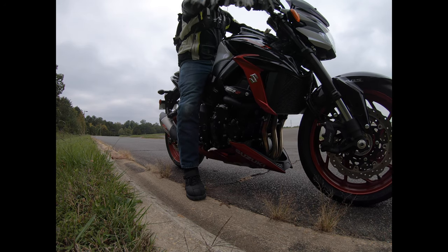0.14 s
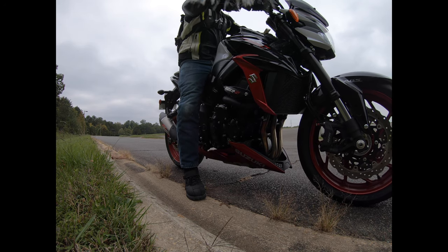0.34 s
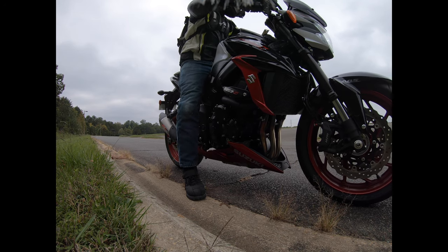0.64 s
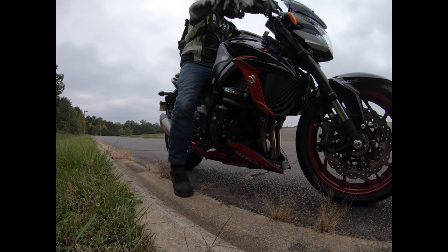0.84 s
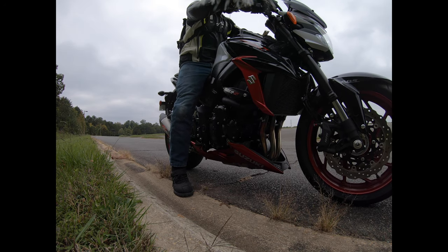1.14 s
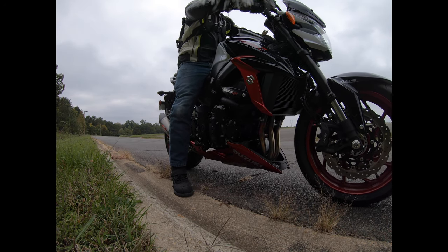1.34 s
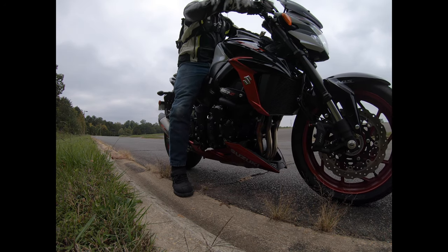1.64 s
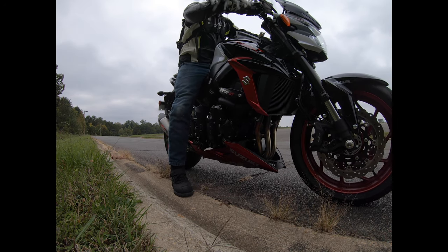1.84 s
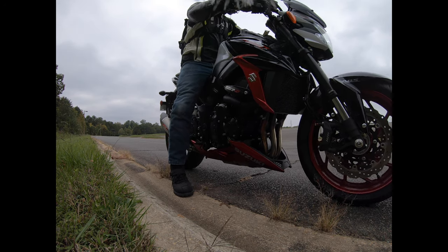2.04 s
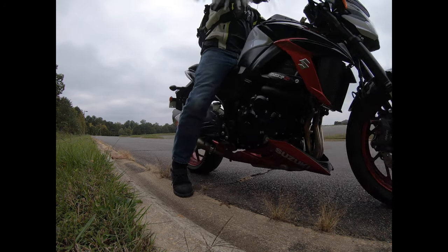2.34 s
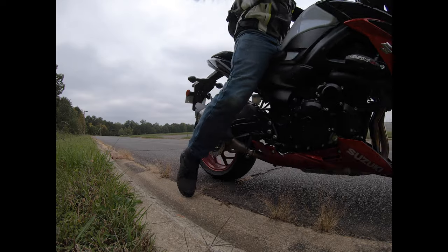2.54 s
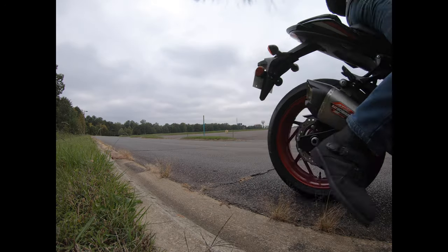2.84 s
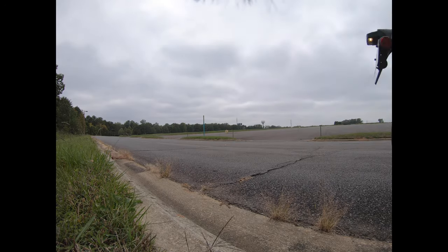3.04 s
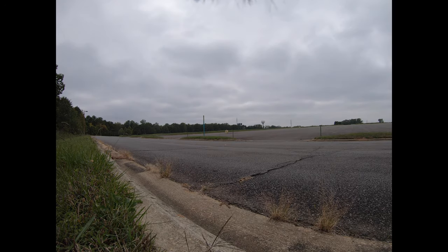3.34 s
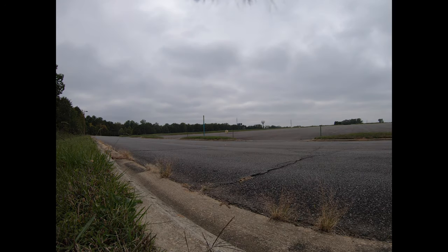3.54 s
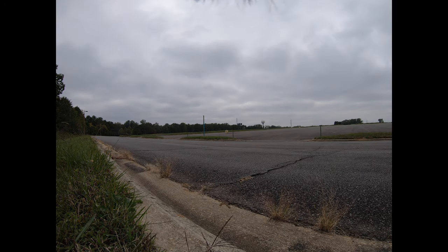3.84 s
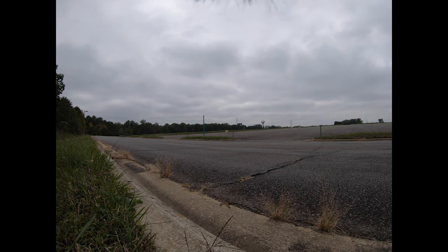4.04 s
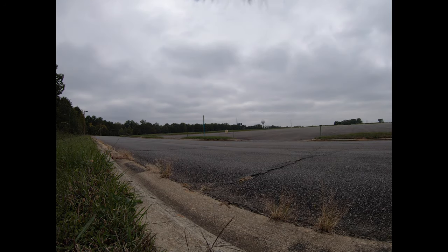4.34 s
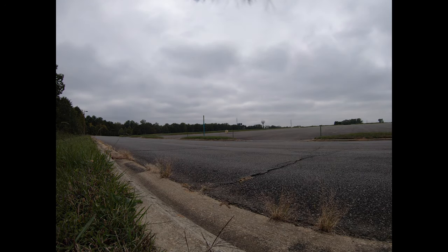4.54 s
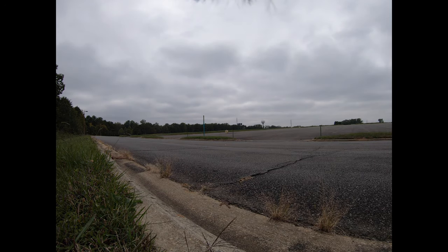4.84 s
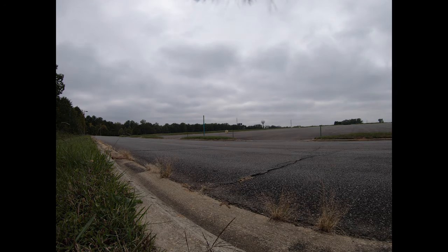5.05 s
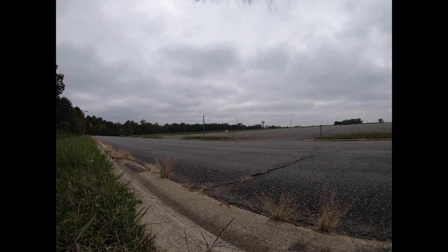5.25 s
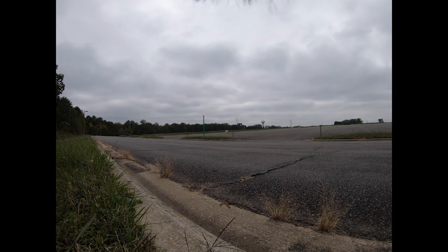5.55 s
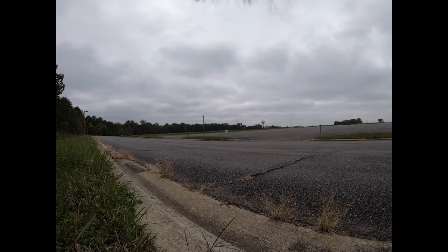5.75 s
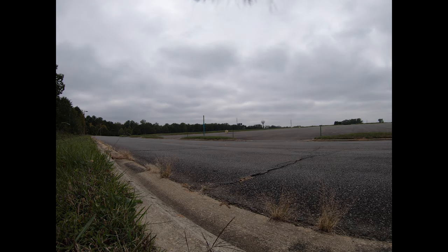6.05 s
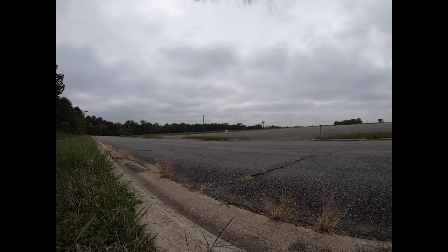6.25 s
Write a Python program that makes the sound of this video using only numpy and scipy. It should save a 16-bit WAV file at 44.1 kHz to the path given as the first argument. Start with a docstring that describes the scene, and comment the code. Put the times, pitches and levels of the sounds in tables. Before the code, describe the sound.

On an open road, a sharp gearbox clack cuts through the low idle of a nearby motorcycle. Two quick revs follow and die down. The bike sets off with a slight stutter and goes by the stationary roadside microphone, its exhaust loud and throaty. The pitch dips, then rises smoothly as the sound recedes. Engine clatter gives way to a soft outdoor rush and a few gentle, low wind buffets.

```python
"""A four-cylinder motorcycle idles close by, clacks into gear, is blipped twice and pulls away.
It stumbles as the clutch bites, passes, sags until the clutch locks, then climbs into the distance.
The note is a periodic train of exhaust pulses, shaped by the resonances of the silencer. Impacts ring
the gearbox and engine covers, meshing teeth and chain links whine, and light wind buffets the microphone.
As the bike leaves, its clatter gives way to dull tyre noise and the outdoor background."""
import sys
import numpy as np
from scipy import signal
from scipy.fft import rfft, irfft, next_fast_len
from scipy.io import wavfile
from scipy.ndimage import uniform_filter1d, map_coordinates

SR = 44100
rng = np.random.default_rng(int(sys.argv[2]) if len(sys.argv) > 2 else 0)


def store_wav(level_fs):
    """Save 16-bit WAV to argv[1]."""
    pcm = np.round(np.clip(np.atleast_2d(level_fs), -1, 1) * 32767)
    wavfile.write(sys.argv[1], SR, pcm.T.astype(np.int16))


N = 282620

CRUISE_HZ = 160  # reference firing rate
# spectrum of one exhaust pulse: f/Hz, level/dB
PULSE_SPECTRUM = [(25, -28), (40, -9.5), (80, -6.5), (115, -1.5), (165, 3.5), (240, 0), (320, -13),
                  (400, -14.5), (490, -16), (640, -5.5), (800, -19.5), (1000, -24), (1250, -31.5),
                  (1600, -33), (2200, -45.5), (5000, -61.5)]
def exhaust(turns, rate, strength, past, echo, round_trip_s):
    """Source and filter: pressure pulses and turbulent gas excite the resonances of the silencer."""
    gas = unit(rng.standard_normal(N) * np.cos(np.pi * turns) ** 2)  # one burst per firing
    revving = np.clip(np.gradient(rate) * SR / 1280, 0, 1)  # full at a rise of 1280 Hz/s
    pulses = firings(turns, rate, strength, jitter=0.00097)
    pulses += amp(-29.5 + 18.5 * revving) * np.sqrt(rate / SR) * gas
    pulses = pulses * SR / (np.sqrt(2) * rate)  # harmonic level independent of firing rate
    # the sharp front, above 330 Hz, leaves 2.5 ms ahead of the boom
    lead = lambda hz: np.exp(2j * np.pi * .0025 * np.logaddexp(0, (hz - 330) / 50) * 50)
    # part of each pulse runs up and down the pipe again
    bounce = lambda hz: 1 / (1 - echo * np.exp(-2j * np.pi * hz * round_trip_s))
    outlet = filtered(pulses, lambda hz: colour(PULSE_SPECTRUM, hz) * lead(hz) * bounce(hz))
    return radiation(outlet, rate, strength, past, revving)


# silencer bands (boom, throat, honk, bark, rasp): lower f/Hz, upper f/Hz
SILENCER_BANDS = [(25, 265), (265, 400), (400, 560), (560, 900), (900, 6000)]
# per band: level/dB, gain at full strength/dB, gain from behind/dB, gain per octave of firing rate/dB
BAND_RESPONSE = [(-19.5, 7, 0.5, 3), (-17, 18, -2, 9), (-30, 25, 0.5, 12.5), (-29.5, 23, -5.5, 16),
                 (-27.5, 25, -6.5, 30)]
# honk band as the silencer goes by: t/s, gain/dB
HONK_GAIN = [(2.25, 1), (2.42, -10), (2.64, 8), (3.0, 9), (3.3, 1.5), (3.7, 5.5)]
def radiation(outlet, rate, strength, past, revving):
    """Directivity and spreading: each band varies with bearing, distance, strength and engine speed."""
    behind = .5 + .5 * np.tanh(past / .75)  # the outlet turns towards the listener
    octaves = np.log2(rate / CRUISE_HZ)
    overrun_db = 4.5 * np.clip(1 - 2 * strength, 0, 1) * (rate / CRUISE_HZ) ** 2  # shut-throttle boom
    beam_db = 9 * np.exp(-((past - 1.61) / .61) ** 2)  # on the outlet's axis 1.61 m past
    extras = [overrun_db, 0, curves(HONK_GAIN)[0], beam_db, beam_db]
    out = np.zeros(N)
    for (lo, hi), response, extra_db in zip(SILENCER_BANDS, BAND_RESPONSE, extras):
        db, strength_db, behind_db, octave_db = response
        source_db = db + strength_db * strength + octave_db * octaves + 3 * revving + extra_db
        path_db = behind_db * behind - 5 * doublings(past)
        flutter_db = 0.1466 * past * wobble(11)  # drifting air shakes the far sound
        out += amp(source_db + path_db + flutter_db) * filtered(outlet, lambda hz: band(hz, lo, hi))
    return out


# odd firings while the clutch bites: t/s, gain/dB
WEAK_FIRINGS = [(1.335, -1), (1.35, -14), (1.448, -14), (1.527, -31)]
def firings(turns, rate, strength, jitter):
    """Cyclic variation: one pulse per firing; unequal cylinder pairs add subharmonics."""
    number = np.arange(np.ceil(turns[0]), np.floor(turns[-1]))
    at = np.searchsorted(turns, number)
    # firings are weak and uneven when the engine lugs, and falter as the throttle shuts
    lug = np.exp(-((rate[at] - 75.5) / 37) ** 2) * np.clip(1 - strength[at], 0, 1)
    cut = sum(np.exp(-((at / SR - shuts) / .015 - .5) ** 2) for _, shuts, *_ in THROTTLE_BLIPS)
    time_scatter, size_scatter = rng.standard_normal((len(number), 2)).T
    pair = (-1) ** number
    db = -.8 * pair + (.5 + 3.5 * lug) * size_scatter - 4.5 * lug - 7 * cut
    for s, gain_db in WEAK_FIRINGS:
        db[np.argmin(np.abs(at - s * SR))] += gain_db
    # the weaker pair is late on an open throttle near cruising speed
    pattern = pair + 0.75 * np.cos(np.pi * number / 2)
    lag = 0.013 * strength[at] * np.exp(-(np.log2(rate[at] / CRUISE_HZ) / .5) ** 2)
    return train(turns, number + lag * pattern + jitter * time_scatter, db)


# blips: opening t/s, closing t/s, top firing rate f/Hz, exponent of the rise, decay rate/s^-1, strength
THROTTLE_BLIPS = [(0.335, .458, 154, 0.99, 2.7, 1), (.549, 0.678, 255, .85, 1.85, 0.67)]
# firing rate on the slipping clutch: t/s, f/Hz
CLUTCH_SLIP = [(1.32, 77.5), (1.54, 75), (1.65, 77.5), (1.8, 105.5), (1.9, 136), (1.97, 162.5),
               (2.13, 156.7), (2.3, 163.2), (2.68, 168.3), (2.95, 154.6), (3.62, 144), (4.09, 105.8)]
def engine_speed(idle_hz):
    """The firing rate is the fundamental: it idles, rises and coasts, slips, then locks to the wheel."""
    t = np.arange(N) / SR
    rate = np.full(N, idle_hz)
    for opens, shuts, top_hz, bend, loss, _ in THROTTLE_BLIPS:
        start = np.interp(opens, t, rate)
        rise = np.clip((t - opens) / (shuts - opens), 0, 1) ** bend
        coast = np.exp(-loss * np.maximum(t - shuts, 0))
        rate = np.where(t > opens, (start + (top_hz - start) * rise) * coast, rate)
    rate = np.where(t > CLUTCH_SLIP[0][0], curves(CLUTCH_SLIP)[0], rate)
    return np.maximum(rate, road_speed())


# exhaust while pulling away: t/s, strength (0-1)
LAUNCH_STRENGTH = [(1.34, 0.12), (1.4, 0.57), (1.62, 0.75), (1.75, 0.96), (1.95, 0.65), (2.5, 0.71),
                   (3, 0.82), (3.5, 0.61), (4.1, 0.89), (5, 0.66), (5.8, 0.62), (6.41, 0.66)]
def exhaust_strength(opening_s, closing_s):
    """Envelope of loudness and brightness: raised in the opening idle, up with throttle, down coasting."""
    t = np.arange(N) / SR
    opening_lift = 0.55 * (t < THROTTLE_BLIPS[0][0] + opening_s)
    strength = curves(LAUNCH_STRENGTH)[0] + opening_lift
    for opens, shuts, *_, depth in THROTTLE_BLIPS:
        gate = np.minimum((t - opens) / opening_s, (shuts - t) / closing_s)
        strength = np.maximum(strength, depth * np.clip(gate + 0.38, 0, 1))
    return strength


def road_speed(roll_s=2.05):
    """Fixed gearing expresses road speed as a firing rate in Hz: a steady launch, then a growing climb."""
    t = np.arange(N) / SR
    lock_s, lock_hz = CLUTCH_SLIP[-1]
    since = np.maximum(t - lock_s, 0)
    return np.interp(t, [roll_s, lock_s], [0, lock_hz]) + 47.5 * since + 5.2 * since ** 2


# puffs from the pipe: t/s, peak level/dB
PIPE_PUFFS = [(0.465, -4.5), (0.687, -24)]
def puffs(width_s):
    """A pressure transient: one soft push of air at each closing of the throttle."""
    out = np.zeros(N)
    for s, db in PIPE_PUFFS:
        x = (np.arange(N) / SR - s) / width_s
        out += amp(db) * (1 - 2 * x ** 2) * np.exp(-x ** 2)
    return out


# blows as the gear engages: t/s, relative level/dB
DOG_IMPACTS = [(0.094, -9.5), (0.096, -13), (0.138, -15.5), (0.1397, -11)]
# modes of the gearbox case: f/Hz, bandwidth/Hz, level/dB
CASE_MODES = [(1680, 150, 3), (2490, 150, 7.5), (3380, 80, 1.5), (4460, 59, -2), (5500, 73, -5),
              (6250, 46, -12), (9120, 90, -3.5)]
def gearbox(t60):
    """Impact excitation: steel dogs strike and rebound, each blow a crack and a ring of the case."""
    t = np.arange(N) / SR
    blows = sum(amp(db - 60 * np.abs(t - s) / t60) * np.clip((t - s) / 0.00091 + .5, 0, 1)
                for s, db in DOG_IMPACTS)
    case = lambda hz: sum((-1) ** k * amp(db) * 1j * hz * width / (f ** 2 - hz ** 2 + 1j * hz * width)
                          for k, (f, width, db) in enumerate(CASE_MODES))
    ring = noise(case)
    crack_spectrum = [(400, 6), (2400, 1.5), (6500, 0.5), (10000, -14.5), (15800, -22)]  # f/Hz, level/dB
    crack = noise(lambda hz: colour(crack_spectrum, hz))
    return blows * (amp(-10) * ring + amp(-5) * crack)


# engine clatter close by: f/Hz, spectrum level/dB
CLATTER_SPECTRUM = [(100, -23), (300, -15), (600, 0), (1000, -7.5), (1300, -4.5), (1600, -4.5), (2100, -2),
                    (2900, -5.5), (4000, -5.5), (5800, -7), (7200, -12.5), (9000, -13), (11500, -20),
                    (15800, -22)]
# tyre noise and outdoor background: f/Hz, spectrum level/dB
RUSH_SPECTRUM = [(50, -4), (300, 9.5), (700, 7), (1100, -1.5), (1800, -4), (3000, -11), (4700, -18),
                 (6500, -14), (8200, -23), (9500, -19.5), (12000, -26.5), (15800, -34)]
# resonances of the engine covers: f/Hz, bandwidth/Hz, gain/dB
COVER_MODES = [(1303, 60, 5.5), (5700, 520, 2), (8350, 340, 5), (8890, 220, 7)]
# joint envelope of clatter and rush: t/s, relative level/dB
NOISE_LEVEL = [(0.2, -30), (0.67, -26.5), (0.68, -24), (0.77, -28), (1.32, -37.5), (1.81, -31), (1.96, -25),
               (2.59, -24.5), (3.07, -46), (3.71, -59), (4.96, -61.5), (6.3, -58), (6.41, -56)]
def clatter_and_rush(turns, past, throb, tick_db, cam_db):
    """Forced vibration: valves and gears ring the covers, giving way to dull tyre and outdoor noise."""
    ticks = unit(rng.standard_normal(N) * (rng.random(N) < 900 / SR))
    drive = unit(rng.standard_normal(N) + amp(tick_db) * ticks)
    drive *= 1 + throb * np.cos(2 * np.pi * turns)
    drive *= amp(0.57 * wobble(45))
    covers = lambda hz: amp(sum(db / (1 + (2 * (hz - f) / width) ** 2) for f, width, db in COVER_MODES))
    cams = amp(cam_db) * valvetrain(turns, count=28, t60=0.0082)
    clatter = filtered(drive + cams, lambda hz: colour(CLATTER_SPECTRUM, hz) * covers(hz) * (hz > 60))
    rush = filtered(drive, lambda hz: colour(RUSH_SPECTRUM, hz) * (hz > 30))
    far = np.clip(0.0067 + (past / 3.45) ** 2, 0, 1)  # only the rush remains by 3.45 m past
    blend = amp(1) * np.sqrt(1 - far) * unit(clatter) + amp(12) * np.sqrt(far) * unit(rush)
    return amp(curves(NOISE_LEVEL)[0]) * blend


def valvetrain(turns, count, t60):
    """Periodic impacts: cams and teeth tick at the same crank angles in every cycle of four firings."""
    angle, size_db = 4 * rng.random(count), 2 * rng.standard_normal(count)
    number = (np.arange(-4, turns[-1], 4)[:, None] + angle).ravel()
    ticks = train(turns, number, np.resize(size_db, len(number)) + rng.standard_normal(len(number)))
    t = np.arange(SR // 20) / SR
    ring = rng.standard_normal(len(t)) * amp(-60 * t / t60)
    rung = signal.fftconvolve(ticks, ring)[:N]
    return steady(filtered(rung, lambda hz: band(hz, 400, 4350, order=3)), turns)


# gear tones: teeth per firing, level/dB
MESH_TONES = [(8.5, -32), (12.9, -32.5)]
def gear_whine(turns, past, blur_rad):
    """Tooth meshing makes tones, roughened by phase modulation and loudest as the engine goes by."""
    tones = sum(amp(db) * np.sin(2 * np.pi * teeth * turns + blur_rad * wobble(120))
                for teeth, db in MESH_TONES)
    approach = np.clip(1.11 + past / PASS_M, 0, 1)
    return amp(-20 * doublings(past)) * approach * tones


# chain envelope: t/s, relative level/dB
CHAIN_LEVEL = [(3.4, -65), (4, -59), (4.8, -54), (6.41, -62)]
# response of the sprocket: f/Hz, gain/dB
SPROCKET_RESPONSE = [(1000, -7), (1200, 12), (1400, -19), (1680, 2.5), (2100, -26), (2700, -22),
                     (3400, -10), (5000, -18)]
def chain(links_per_firing):
    """Harmonics of the link rate follow road speed and swell as they cross the sprocket's resonances."""
    link_hz = links_per_firing * road_speed()
    phase = 2 * np.pi * np.cumsum(link_hz * (1 + 0.007 * wobble(60))) / SR
    tones = np.zeros(N)
    for k in range(3, 7):
        flicker = amp(2.2 * wobble(11) + 2.8 * wobble(25))
        tones += colour(SPROCKET_RESPONSE, k * link_hz) * flicker * np.sin(k * phase)
    return amp(curves(CHAIN_LEVEL)[0] - 6) * tones


# wind pressure: f/Hz, spectrum level/dB
WIND_SPECTRUM = [(5, 19.5), (12, -15), (20, -22), (30, -39), (50, -22), (90, -42), (200, -50), (600, -82)]
# gusts: t/s, half length/s, level/dB
WIND_GUSTS = [(4.462, .16, -20), (4.706, 0.056, -15), (5.016, 0.045, -22), (5.744, 0.25, -26)]
def wind(breeze_db):
    """Turbulence: light gusts buffet the microphone with low-frequency pressure fluctuations."""
    t = np.arange(N) / SR
    gusts = sum(amp(db) * np.exp(-((t - s) / length) ** 2) for s, length, db in WIND_GUSTS)
    level = (amp(breeze_db) + gusts) * amp(1.5 * wobble(10))
    return level * noise(lambda hz: colour(WIND_SPECTRUM, hz) * (hz > 4))


PASS_M, CLOSEST_M = 0.16, 0.83  # road to the closest point; gap to the microphone there
def doublings(past):
    """Doublings of distance from the microphone, past metres beyond the closest point."""
    return np.log2(np.hypot(past, CLOSEST_M) / CLOSEST_M)


def train(turns, number, db):
    """An impulse of level db wherever the firing count passes a number, shared between two samples."""
    place = np.clip(np.interp(number, turns, np.arange(N)), 0, N - 2)
    at = place.astype(int)
    size = amp(db) * (place > 0) * (place < N - 2)
    return np.bincount(at, size * (1 - place + at), N) + np.bincount(at + 1, size * (place - at), N)


def steady(x, turns):
    """x at rms 1 over every few firings."""
    grid = np.arange(turns[0], turns[-1], 1 / 32)
    energy = np.interp(grid, turns, np.cumsum(x ** 2 * np.gradient(turns)))
    power = uniform_filter1d(uniform_filter1d(np.gradient(energy, grid), size=128), size=64)
    return x / np.sqrt(np.interp(turns, grid, np.abs(power)) + 1e-20)


def amp(db):
    """Decibels to amplitude ratio."""
    return 10 ** (np.asarray(db) / 20)


def unit(x):
    """x at rms 1."""
    return x / np.sqrt(np.mean(x ** 2) + 1e-20)


def colour(points, hz):
    """Gain through (f/Hz, level/dB) points on a logarithmic frequency axis."""
    f, db = np.transpose(points)
    return amp(np.interp(np.log(hz + 1), np.log(f + 1), db))


def curves(rows):
    """Linear interpolation: one value per sample for each column after the time."""
    s, *cols = np.transpose(rows)
    return [np.interp(np.arange(N) / SR, s, c) for c in cols]


def wobble(rate):
    """A smooth random curve, rate knots a second."""
    return map_coordinates(rng.standard_normal(int(N * rate / SR) + 4), [np.arange(N) * rate / SR])


def filtered(x, response):
    """Linear filtering: the spectrum of x times a frequency response."""
    m = next_fast_len(N + SR // 4)
    return irfft(rfft(x, m) * response(np.fft.rfftfreq(m, 1 / SR)), m)[:N]


def noise(response):
    """White noise shaped by a frequency response, at rms 1."""
    return unit(filtered(rng.standard_normal(N), response))


def band(hz, lo, hi, order=14):
    """Complementary band gain: neighbouring bands add up to one."""
    return 1 / (1 + (hz / hi) ** order) - 1 / (1 + (hz / lo) ** order)


def scene():
    """Superposition: exhaust, clatter and gears share one firing count; chain, clack and wind add in."""
    rate = engine_speed(idle_hz=40.15)
    strength = exhaust_strength(opening_s=0.02, closing_s=0.097)
    past = .06 * np.cumsum(road_speed()) / SR - PASS_M  # metres past the microphone, 0.06 per firing
    turns = np.cumsum(rate) / SR - .217  # running count of firings
    turns += 0.00052 * past * wobble(14)  # drifting air makes the far sound waver
    mix = exhaust(turns, rate, strength, past, echo=0.057, round_trip_s=0.00625) + puffs(width_s=0.002)
    mix += clatter_and_rush(turns, past, throb=0.11, tick_db=-8, cam_db=-5)
    mix += gear_whine(turns, past, blur_rad=0.82)
    return (mix + chain(links_per_firing=3.77) + gearbox(t60=0.05) + wind(breeze_db=-38))[None]


def record(dry):
    """Saturation and band limiting: the microphone rounds the tallest peaks and cuts the top treble."""
    rounded = dry[0] / (1 + np.abs(dry[0] / .97) ** 8) ** (1 / 8)
    return filtered(rounded, lambda hz: hz < 15850)[None]


dry = scene()
out = record(dry)
store_wav(out)
```